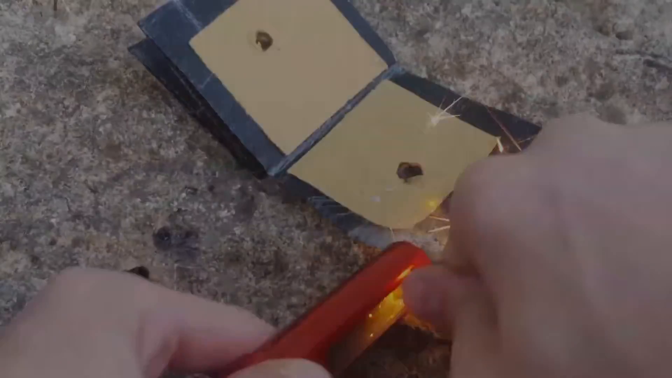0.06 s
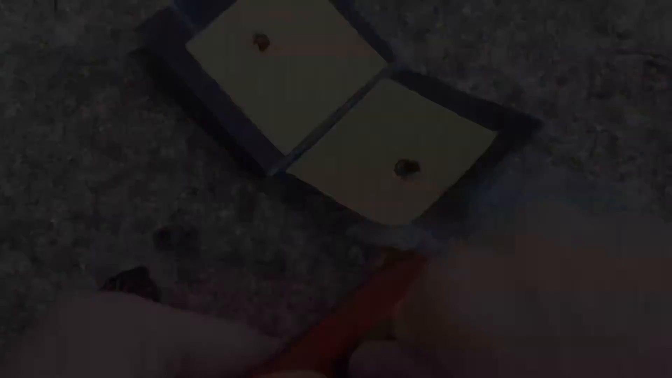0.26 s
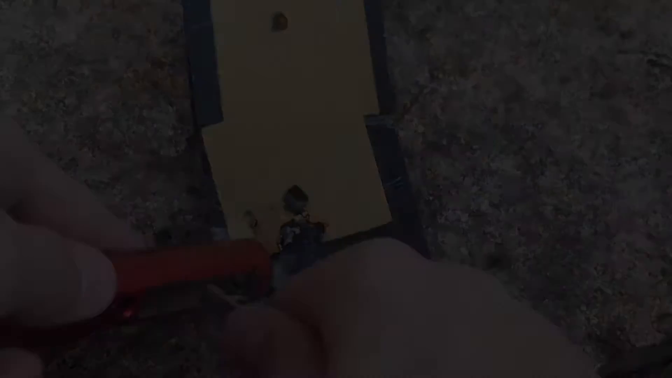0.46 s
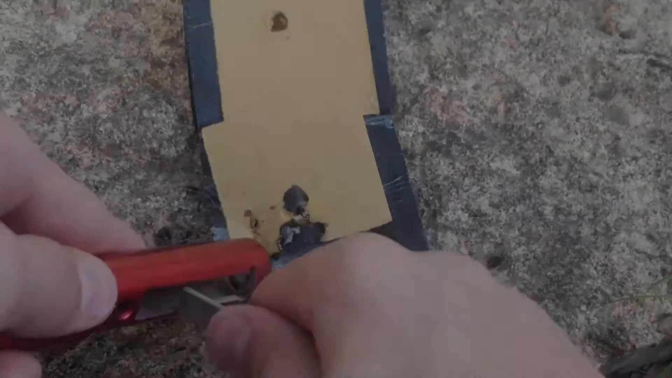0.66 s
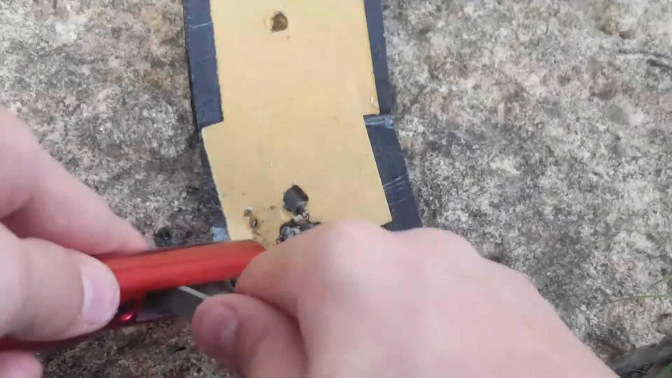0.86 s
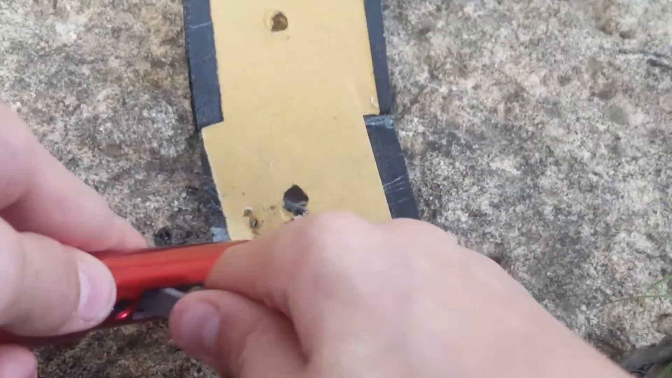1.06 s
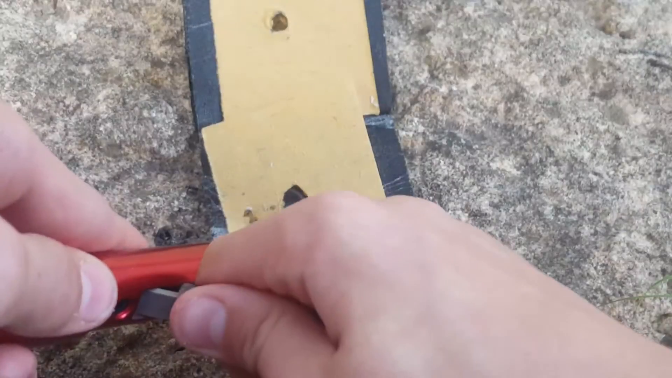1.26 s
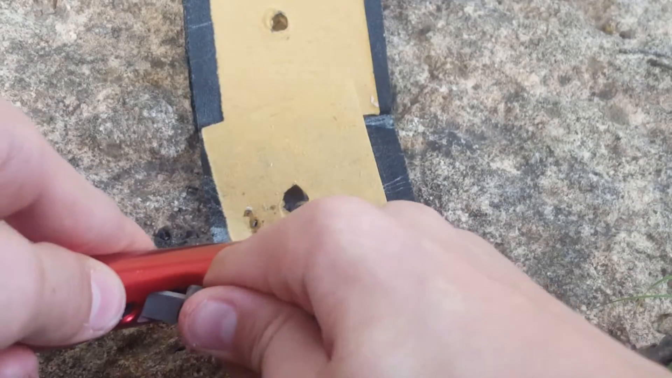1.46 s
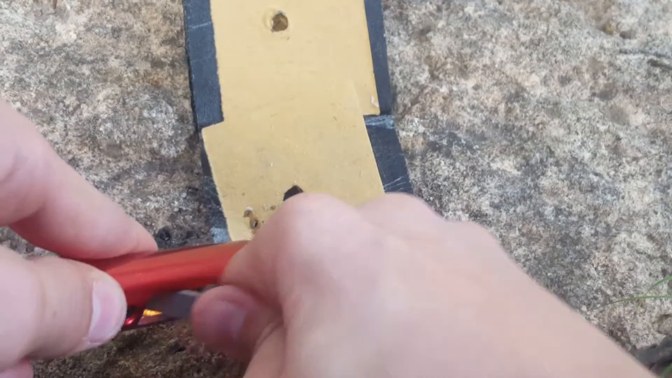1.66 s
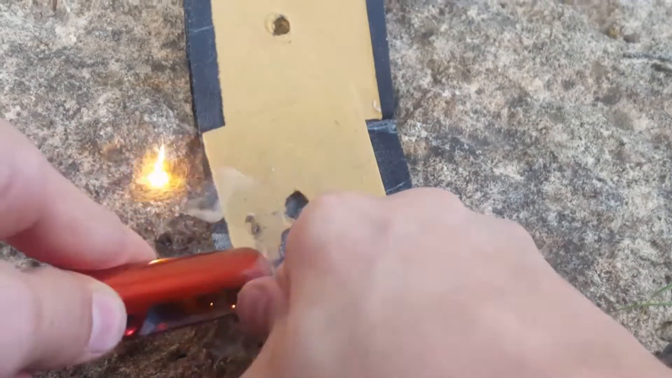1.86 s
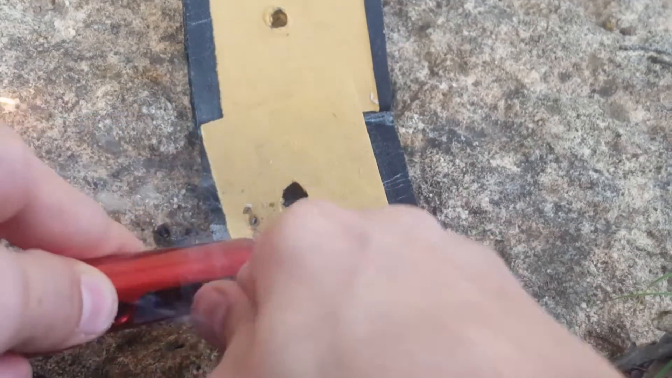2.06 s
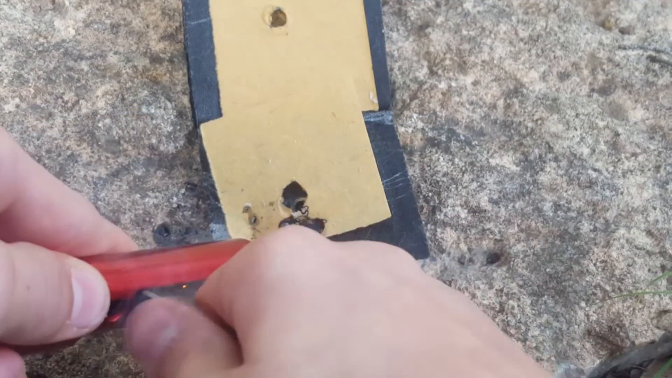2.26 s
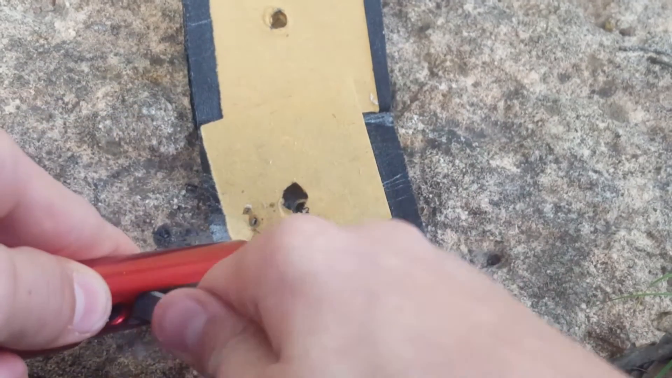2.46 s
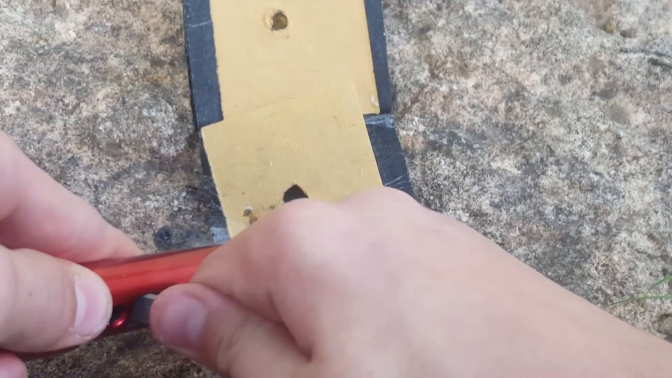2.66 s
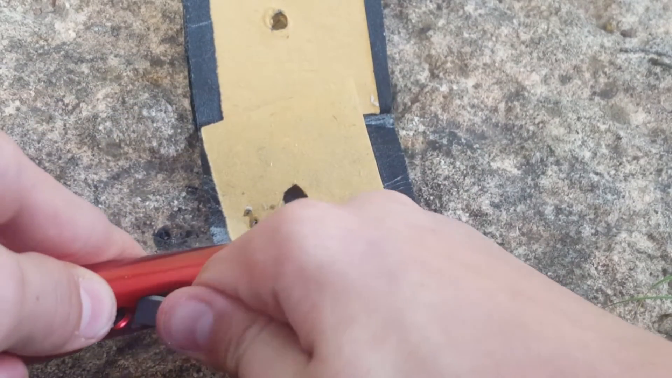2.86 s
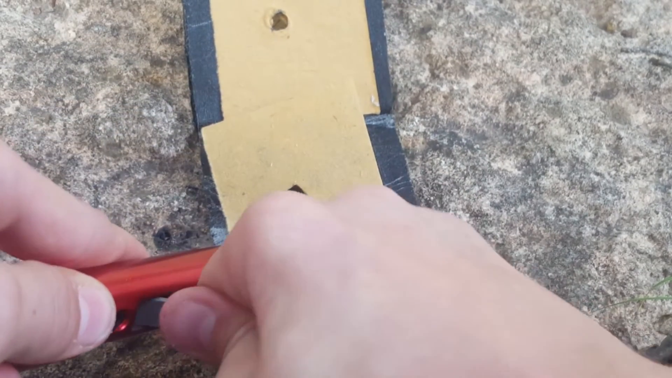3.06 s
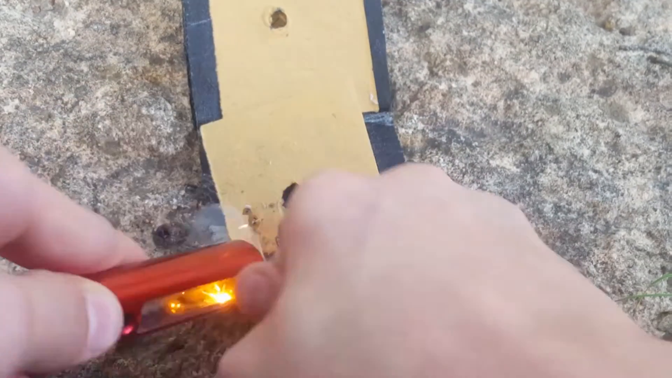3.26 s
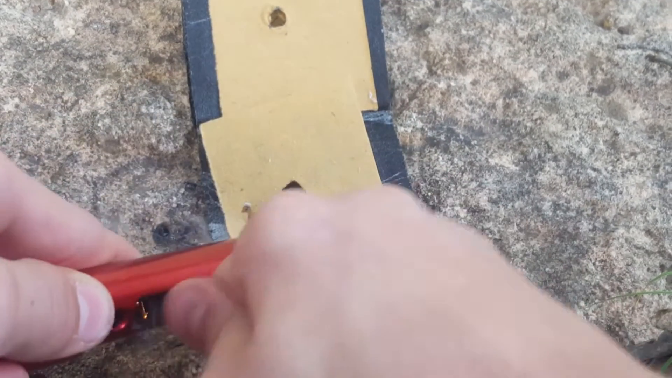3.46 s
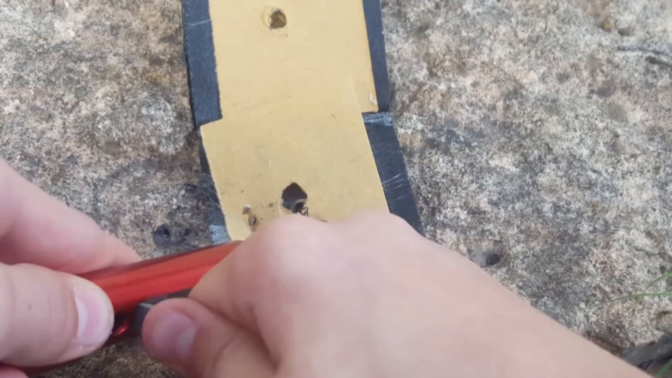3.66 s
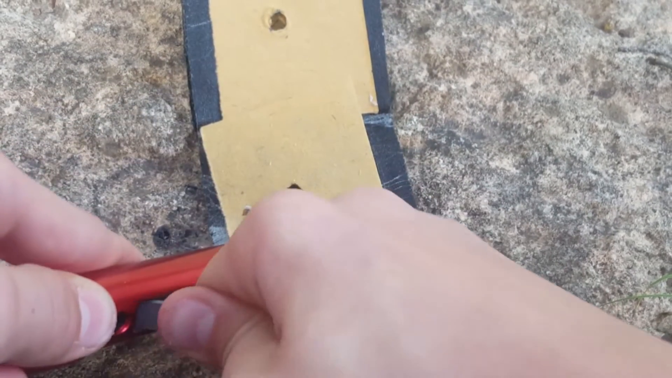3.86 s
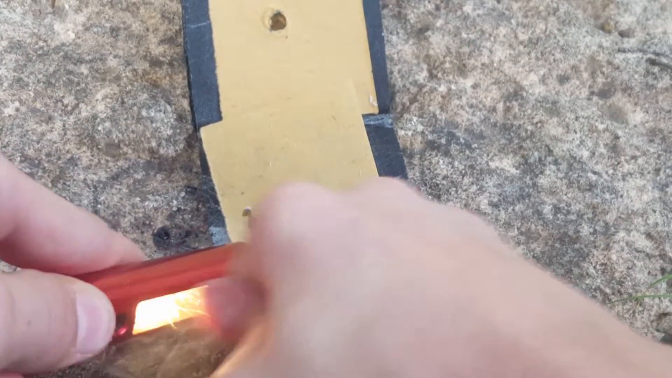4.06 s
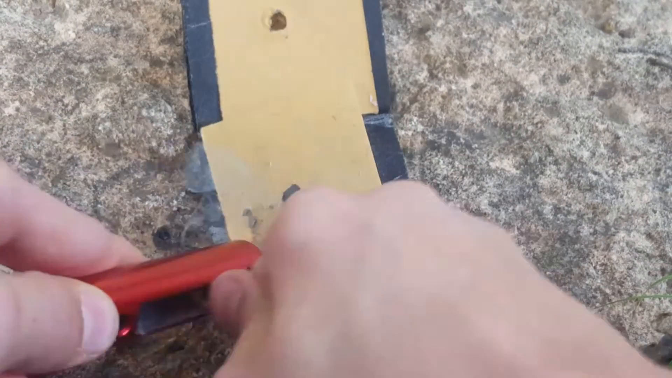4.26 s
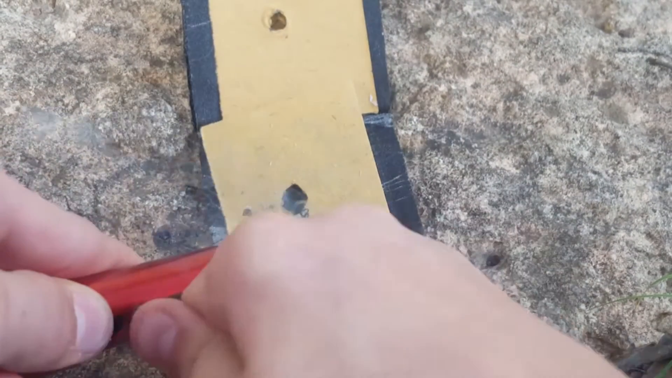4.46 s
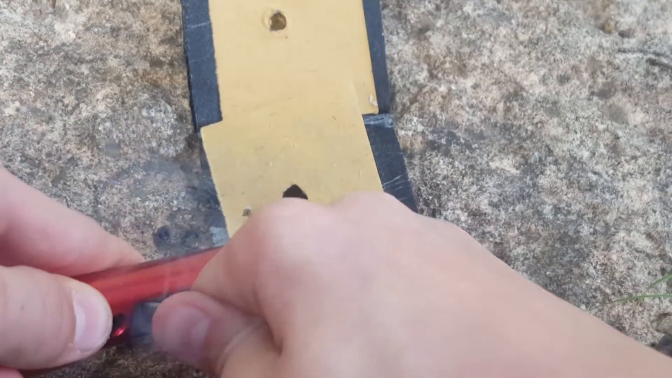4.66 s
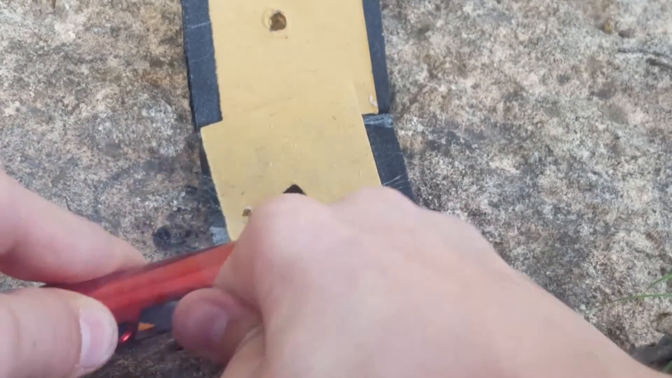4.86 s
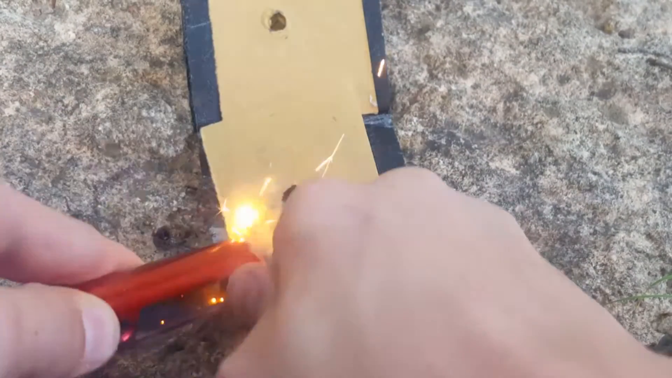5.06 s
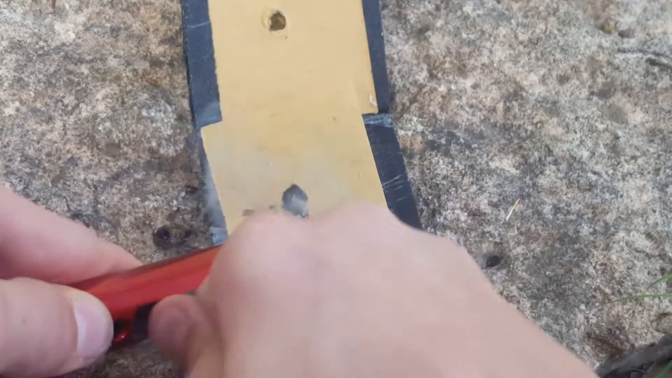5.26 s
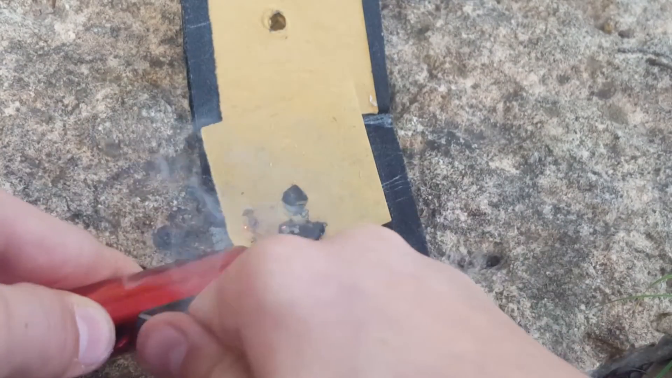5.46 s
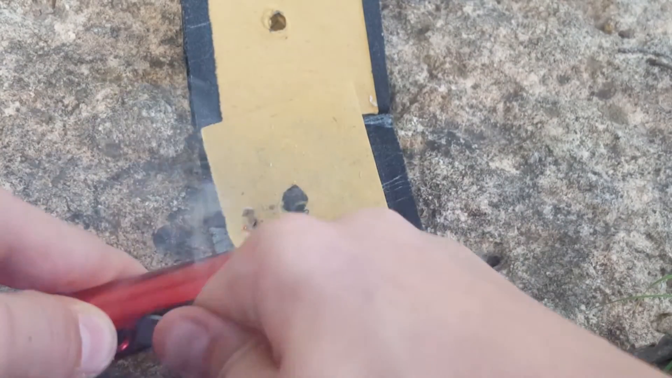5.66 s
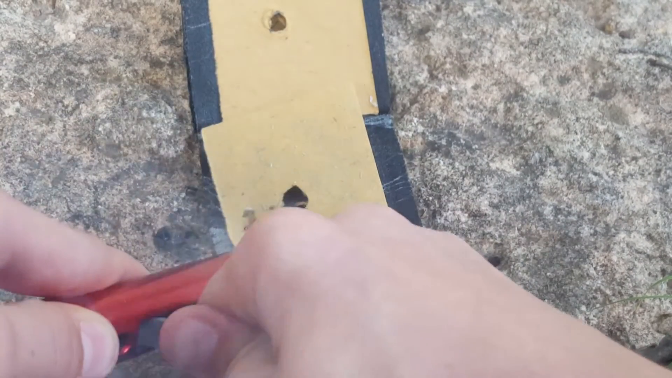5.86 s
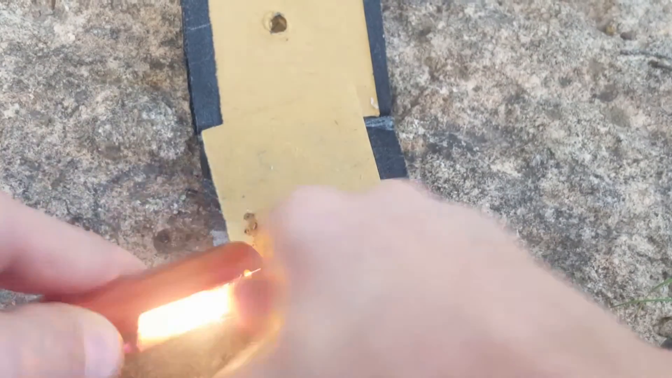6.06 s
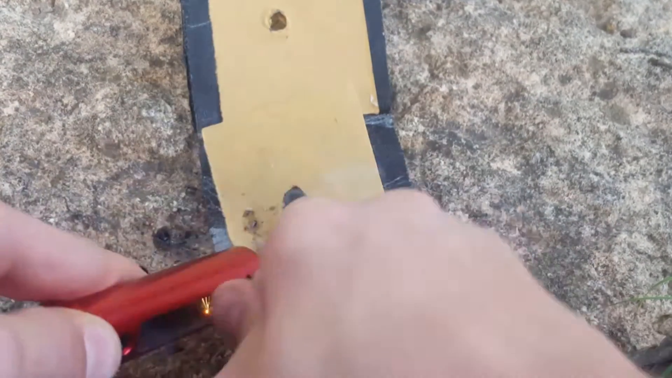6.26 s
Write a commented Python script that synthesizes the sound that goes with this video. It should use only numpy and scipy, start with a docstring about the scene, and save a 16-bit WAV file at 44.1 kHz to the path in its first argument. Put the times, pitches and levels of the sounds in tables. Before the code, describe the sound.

A dry, close stereo sound of metal scraping metal over stony ground, slightly stronger on the left. Short rasping strokes burst out sharply and snap off with clacks, separated by one to two quiet seconds of faint rubbing and clicking. The middle strokes come closer together and have more rattling contacts. Low distant traffic and soft microphone hiss stay far below, joined later by a faint low engine drone.

```python
"""Steel striker on a fire rod

A steel striker is pushed hard down a fire rod near stony ground, close to a two-port microphone.
Each stroke is unevenly modulated noise that also rings the steel modes; it swells and ends in a clack.
Between strokes the striker rubs softly and ticks on the rod: faint grit, short cracks and decaying modes.
Filtered noise makes far traffic and microphone hiss; summed harmonics make an engine slowly gaining speed.
"""
import sys
import numpy as np
from scipy import signal
from scipy.fft import rfft, irfft
from scipy.io import wavfile
from scipy.ndimage import uniform_filter1d

SR = 44100
rng = np.random.default_rng(int(sys.argv[2]) if len(sys.argv) > 2 else 0)


def undo_db(level):
    """Turn decibels back into plain size, where 20 dB means ten times bigger."""
    steps = np.asarray(level, float) / 20
    return 10 ** steps


def log_audio(samples):
    """Write samples as a 16-bit WAV file to the path given in sys.argv[1]."""
    # one column per channel
    frames = np.atleast_2d(samples).T
    # limit to full scale, then quantise
    limited = np.clip(frames, -1, 1)
    pcm = np.round(limited * 32767).astype(np.int16)
    wavfile.write(sys.argv[1], SR, pcm)


N = 278344  # samples, about 6.3 s

# modes of rod and striker: freq_hz [Hz], level_db [dB, relative], t60_s [s]
STEEL_MODES = [(1695, -5, 0.034), (2480, 1, 0.015), (2824, -3, 0.066), (4005, 2.5, 0.037), (4347, 5, 0.012),
               (4810, 0.5, .02), (5437, -0.5, 0.016), (6010, -3, .015), (6465, 0.5, 0.032), (7360, 2, .015),
               (8260, -7, 0.0025), (11550, -5, .012), (11900, -5, 0.0076), (14160, -1.5, .01)]
# spectrum of steel contact as heard through the microphone, with its resonances near 6.5 and 12 kHz:
# freq_hz [Hz], density_db [dB per Hz, relative]
CONTACT_SPECTRUM = [(400, -30.5), (700, -18), (1600, -15.5), (2100, -17), (3200, -8.5), (4200, -5),
                    (5700, -4.5), (6500, 3.5), (7800, -8), (9900, -16.5), (12200, 1.5), (14000, -12.5),
                    (15600, -18), (16300, -46)]
APART_DB = -3  # opposed sound at the two ports, against their common sound


def unit(x):
    """Normalization by mean power: scale to rms 1."""
    return x / np.sqrt(np.mean(x ** 2))


def colour(x, points):
    """Minimum-phase filtering: a folded cepstrum gives a causal response through (Hz, dB) points."""
    hz, db = np.transpose(points)
    grid_hz = np.arange(2049) * SR / 4096 + 1
    log_gain = np.interp(np.log(grid_hz), np.log(hz), db) * np.log(10) / 20
    cepstrum = irfft(log_gain)[:2048]
    folded = cepstrum * np.r_[1, 2 * np.ones(2047)]
    response = irfft(np.exp(rfft(folded, 4096)))
    return signal.fftconvolve(x, response)[:len(x)]


def parts(x):
    """Band splitting: the dull, body, middle and bright part of a sound."""
    # crossovers: edge_hz [Hz]
    edges_hz = [2800, 5000, 9000]
    low, mid, top = edges_hz
    shapes = (low, "low"), ([low, mid], "band"), ([mid, top], "band"), (top, "high")
    filters = [signal.butter(4, hz, kind, fs=SR, output="sos") for hz, kind in shapes]
    return [signal.sosfilt(sos, x) for sos in filters]


def walk(rate):
    """Slow random modulation: levels held 1 / rate s and slewed, with rms 1."""
    hold = max(int(SR / rate), 2)
    levels = np.repeat(rng.standard_normal(N // hold + 1), hold)
    return unit(uniform_filter1d(levels, hold)[:N])


def tail(t60, seconds):
    """Diffuse reverberation: exponentially decaying noise of energy 1 stands for many small reflections."""
    t = np.arange(int(seconds * SR)) / SR
    h = rng.standard_normal(len(t)) * 1000. ** (-t / t60)
    return h / np.sqrt(np.sum(h ** 2))


def ports(common, apart, apart_db):
    """Sum and difference: both ports share one sound; another stretch of the object reaches them opposed."""
    return common + undo_db(apart_db) * apart * np.array([[1], [-1]])


def rubbing():
    """Stick-slip friction: the edge catches and slips, making uneven grit that rings the steel modes."""
    gains = pressure()
    middle_gain = gains[2]
    # each part of the rub catches at its own moments
    gains = [gain * unit(undo_db(2 * walk(120))) for gain in gains]
    # roughness of the grit: a new random level every 16 samples, now and then high
    roughness = np.repeat(rng.exponential(size=N), 16)[:N]
    slips = unit(undo_db(2.0 * walk(600) + 1.4 * walk(200) + 1.02 * roughness))
    # each mode is fed unevenly as the contact point travels
    feeds = [undo_db(db + 3.5 * walk(40)) for _, db, _ in STEEL_MODES]
    ring_db = -8.5  # ringing against grit, before colouring
    voices = []
    for noise in rng.standard_normal((2, N)):
        grit = unit(noise * slips)
        rings = []
        for (hz, _, t60), feed in zip(STEEL_MODES, feeds):
            pole = np.exp(2j * np.pi * hz / SR - np.log(1000) / (t60 * SR))
            resonance = signal.lfilter([1], [1, -pole], grit).imag
            rings.append(feed * unit(resonance))
        rub = colour(grit + undo_db(ring_db) * unit(sum(rings)), CONTACT_SPECTRUM)
        singing = sum(rings[1:4])  # low steel modes, left free by a light rub
        bands = [unit(band) for band in parts(rub) + [singing]]
        voices.append(sum(gain * band for gain, band in zip(gains, bands)))

    # thud passed into hand and ground: freq_hz [Hz], density_db [dB per Hz, relative]
    hand_spectrum = [(40, -14), (90, -4.5), (200, -4), (350, -7), (800, -18.5), (2500, -39.5)]
    hand_db, knee_db = -16.5, -47.5
    # pressure well under the knee passes hardly any thud
    press = middle_gain ** 2 / (middle_gain + undo_db(knee_db))
    thud = [undo_db(hand_db) * press * unit(colour(noise, hand_spectrum))
            for noise in rng.standard_normal((2, N))]
    return ports(*voices, APART_DB), ports(*thud, -10)


def pressure():
    """Incoherent addition: strokes, light rubs and skids sum by power into dull to bright and sing gains."""
    # hard strokes, levels of the middle part: touch_s [s], touch_db [dB], peak_s [s], peak_db [dB], stop_s [s]
    strokes = [(0.0, -51, 0.064, -28, 0.14), (1.735, -53, 1.836, -28.5, 1.891),
               (3.23, -42.5, 3.305, -29.5, 3.402), (4.16, -45, 4.198, -26, 4.25),
               (4.961, -46.5, 5.044, -27.5, 5.14), (6.137, -42, 6.188, -27.5, 6.24)]
    # colour at touch, peak and stop, against the middle part: dull_db [dB], body_db [dB], bright_db [dB]
    stroke_colour = [(-1.5, -1, -2.5), (-9.5, 0, -1.5), (-8.5, -16.5, -7)]
    # light rubs that fade in and out, slides and held run-outs of strokes:
    # start_s [s], length_s [s], start_db [dB], end_db [dB], weight_db [dB]
    light_rubs = [(.136, 0.069, -45.5, -52.5, -1.5), (.226, 0.046, -50, -58.5, -2.5),
                  (.286, 0.006, -56, -55.5, -2), (.305, 0.061, -66, -70.5, -1.5),
                  (.77, 0.03, -64, -58.5, -3), (.85, .11, -66, -68, -8.5), (1.046, 0.052, -65.5, -69, -6.5),
                  (1.155, 0.052, -60.5, -55.5, 2.5), (1.922, .01, -58, -57.5, -6),
                  (2.025, 0.062, -63, -50.5, 1.5), (2.178, 0.13, -58, -57.5, -6),
                  (2.621, 0.011, -65.5, -63, 6.5), (3.17, 0.023, -62, -63.5, 4.5),
                  (3.42, 0.082, -50, -43, -2), (3.52, 0.031, -53.5, -59, 3.5),
                  (3.574, 0.081, -53.5, -56.5, 2), (3.89, .13, -72, -70.5, 0.5),
                  (4.05, .004, -49.5, -50, 2), (4.134, 0.0017, -55, -63, 4),
                  (4.224, .068, -38.5, -48.5, -12.5), (4.355, 0.17, -48.5, -56.5, -0.5),
                  (5.155, 0.054, -56.5, -61.5, -8), (5.29, 0.17, -53.5, -62.5, 2),
                  (5.488, 0.012, -61.5, -63.5, 6.5), (6.23, 0.0068, -41.5, -34.5, -9.5),
                  (6.272, 0.0054, -37, -37, -11), (6.303, 0.0026, -49, -40, -20)]
    # the striker drops onto the rod, skids and jumps off:
    # start_s [s], length_s [s], start_db [dB], end_db [dB], weight_db [dB]
    skids = [(1.969, 0.018, -44, -58, -4), (3.2, .018, -47, -51, -3), (4.028, .052, -54.5, -56, 0),
             (4.897, 0.0335, -54.5, -55, -1), (5.214, .075, -42.5, -49.5, -1.5),
             (6.057, .015, -46, -50, -1)]
    # light rub of weight 0, against its middle part: dull_db [dB], body_db [dB]
    rub_lows = (-3.5, 2)
    rub_dull_db, rub_body_db = rub_lows
    rub_bright_db, sing_at_rest_db = -3.5, -7.5
    lifted_db = -80  # at this level the rub is silent
    slip_off_s, slip_off_db = 0.018, -5.5  # after the peak the edge slips off
    run_out_db = -20.5  # then it runs out this far under the peak
    swell_db, swell_db_per_s = -68.5, 21.5  # a faint hiss rises up to the touch
    fade_in_db_per_s, fade_out_db_per_s, drop_db_per_s = 798.5, 698, 4000
    spent_db_per_s = 380  # extra decay of a stroke after its stop

    t = np.arange(0, N + 44, 44) / SR  # control steps of about 1 ms
    rubs, free_s = [], 0.
    for touch, touch_db, peak, peak_db, stop in strokes:
        times = [touch, peak, peak + slip_off_s, stop + slip_off_s]
        levels = [touch_db, peak_db, peak_db + slip_off_db, peak_db + run_out_db]
        before, after = np.maximum(touch - t, 0), np.maximum(t - stop, 0)
        push = np.interp(t, times, levels) - drop_db_per_s * before
        swell = np.where(t > free_s, swell_db - swell_db_per_s * before, lifted_db)
        db = np.maximum(push, swell) - spent_db_per_s * after
        tints = [np.interp(t, [touch, peak, stop], column) for column in np.transpose(stroke_colour)]
        rubs.append((db, *tints, lifted_db))
        free_s = stop

    kinds = (light_rubs, fade_in_db_per_s, fade_out_db_per_s), (skids, drop_db_per_s, drop_db_per_s)
    for table, on, off in kinds:
        for start, length, start_db, end_db, weight_db in table:
            stop = start + length
            db = np.interp(t, [start, stop], [start_db, end_db])
            db = db - on * np.maximum(start - t, 0) - off * np.maximum(t - start - length, 0)
            # a heavier, flatter contact lifts the low parts
            rubs.append((db, weight_db + rub_dull_db, weight_db + rub_body_db, rub_bright_db,
                         weight_db + sing_at_rest_db))

    power = 0
    for db, dull_db, body_db, bright_db, sing_db in rubs:
        gain = np.maximum(undo_db(db) - undo_db(lifted_db), 0)
        part_levels = dull_db, body_db, 0, bright_db, sing_db
        power = power + np.array([gain * undo_db(part_db) for part_db in part_levels]) ** 2
    return [np.interp(np.arange(N) / SR, t, np.sqrt(row)) for row in power]


def ticks():
    """Impact excitation: each contact is a short crack plus steel modes struck with random strengths."""
    # clacks and ticks: start_s [s], middle_db [dB, peak of the middle part], weight_db [dB], bright_db [dB],
    # favoured_hz [Hz, near which the steel answers most]
    contacts = [(0.0761, -11.5, -9.5, -1, 6400), (0.1355, -30.5, -19, -5, 6000),
                (0.3227, -51.5, 6.5, 6, 4400), (0.425, -55.5, -4.5, 1.5, 7300), (0.6488, -44, 4, -9, 2500),
                (0.7125, -60, -5, 6, 2500), (0.7976, -40, -16, -27, 6400),
                (0.8062, -17, -18.5, -14.5, 7300), (1.0948, -42.5, 5.5, -9, 2500),
                (1.21, -48, 2, -18, 2500), (1.3866, -54, -7.5, -5, 4850), (1.594, -41, -2, -2.5, 4850),
                (1.8495, -13.5, -10, 0, 6400), (1.8743, -34.5, -18.5, 3, 6000),
                (1.9248, -30, -11, 2.5, 6400), (1.9656, -34.5, -13, -18, 7300),
                (1.9815, -29.5, -7.5, -11, 7300), (2.0213, -49.5, 12, -10, 4350),
                (2.4447, -38, -16, 3.5, 4850), (2.4949, -50.5, -11.5, -6, 7300),
                (2.6305, -54, 12, -14.5, 2500), (3.0055, -50, 3, 4.5, 4350), (3.1585, -51.5, -1, -3, 5400),
                (3.2975, -23.5, 5, -12, 4000), (3.3135, -17, -8, 4.5, 6400), (3.3325, -24, -10, -7.5, 6400),
                (3.4119, -26, -20, -7, 6400), (3.4422, -29.5, -11, -4, 6400),
                (3.491, -18.5, -11.5, -6, 6400), (3.5065, -36, 4, -4, 2800), (3.5715, -45.5, 3.5, 4, 2800),
                (3.6366, -32, 3.5, -8, 5400), (3.8865, -45.5, 0.5, -10, 7300),
                (3.976, -47.5, -0.5, -5, 5400), (3.9835, -41, -1.5, -5, 7300), (4.01, -50.5, 0, -6, 2800),
                (4.0386, -44.5, 9, 5.5, 5400), (4.1398, -41, -8, 3.5, 6000), (4.161, -34, -2.5, 1, 2800),
                (4.1879, -21, -9, 0, 6400), (4.2062, -13.5, -13.5, 3.5, 6400), (4.2313, -42, 6, -10, 1600),
                (4.2972, -29.5, -13.5, -10, 6400), (4.3171, -44, -4, 0, 6400),
                (4.5158, -40, 5.5, -20, 2500), (4.6429, -48.5, 0, -6, 4000),
                (4.7456, -52.5, -6.5, -3.5, 4000), (4.8985, -51.5, 3, -7, 2800),
                (4.9595, -42.5, 0.5, -9.5, 6400), (5.0543, -12, -5.5, 0.5, 6400),
                (5.1354, -33, 3.5, 1, 6400), (5.2136, -25.5, -3, -22, 4350), (5.7357, -41.5, 1, -6.5, 7300),
                (5.82, -59, 2, 5, 2500), (6.0626, -37.5, -12, -2, 4850), (6.14, -42.5, 3, 15.5, 6400),
                (6.1955, -13, -5, -4, 6400)]
    # contact of weight 0, against its middle part: dull_db [dB], body_db [dB]
    contact_lows = (-1, 2.3)
    t60_s, attack_s = 0.009, 0.00099
    crack_db = 3.5  # noise against modes, before colouring
    favoured_db = -7.5  # the mode that answers most, against the peak of the rest

    out = np.zeros((2, N + 2048))
    t = np.arange(2048) / SR
    hz, mode_db, _ = np.transpose(STEEL_MODES)[:, :, None]
    fade = 1000. ** (-t / t60_s) * np.minimum(t / attack_s, 1)
    for start, db, weight_db, bright_db, near_hz in contacts:
        favoured = np.argmin(np.abs(hz - near_hz))
        dull_db, body_db = weight_db + np.array(contact_lows)
        for voice in out:
            strength, detune, phase = rng.standard_normal((3, len(STEEL_MODES), 1))
            waves = np.sin(2 * np.pi * hz * (1 + 0.03 * detune) * t + phase)
            modes = np.sum(undo_db(mode_db + 3.0 * strength) * waves, axis=0)
            crack = undo_db(crack_db) * rng.standard_normal(len(t))
            hit = colour(fade * (unit(modes) + crack), CONTACT_SPECTRUM)
            dull, body, middle, bright = (part / np.max(np.abs(part)) for part in parts(hit))
            hit = middle + undo_db(dull_db) * dull + undo_db(body_db) * body + undo_db(bright_db) * bright
            ring_hz = hz[favoured] * (1 + 0.022 * detune[favoured])
            ring = fade / np.max(fade) * np.sin(2 * np.pi * ring_hz * t + 3 * phase[favoured])
            ring = undo_db(favoured_db) * np.max(np.abs(hit)) * ring
            first = int(start * SR)
            voice[first:first + len(t)] += undo_db(db) * (hit + ring)
    return ports(*out[:, :N], APART_DB)


def engine():
    """Harmonic synthesis: lines at engine orders follow a rising firing rate; the air makes them waver."""
    # far engine: time_s [s], firing_hz [Hz], level_db [dB, relative]
    course = [(2.6, 93, -69.5), (3.0, 100, -67), (3.5, 103, -61), (4.2, 106, -59.5), (4.6, 112, -64),
              (5.6, 118, -58), (6.31, 119, -55)]
    # lines: multiple [of the firing rate], line_db [dB, relative]
    orders = [(.5, -15), (1, 3.5), (1.5, -12.5), (2, -20), (2.5, -30)]
    s, hz, db = np.transpose(course)
    t = np.arange(N) / SR
    firing_hz = np.interp(t, s, hz) * (1 + 0.009 * walk(14))
    phase = 2 * np.pi * np.cumsum(firing_hz) / SR
    lines = sum(undo_db(line_db + 1.3 * walk(9)) * np.sin(multiple * phase) for multiple, line_db in orders)
    return np.sqrt(2) * lines * undo_db(np.interp(t, s, db, left=-90))


def background():
    """Spatial coherence: traffic is nearly alike at both ports, while each port hisses alone."""
    # level of the low rumble, which dips and recovers: time_s [s], level_db [dB]
    rumble_course = [(0.0, -56), (0.259, -63.5), (0.98, -59), (1.85, -57), (2.13, -63), (3.501, -54.5),
                     (4.921, -62.5), (5.08, -59), (6.31, -57)]
    # traffic spectrum: freq_hz [Hz], density_db [dB per Hz, relative]
    rumble_spectrum = [(15, -35.5), (35, -14), (55, -4), (90, 1.5), (150, -7), (200, -12.5), (260, -21.5),
                       (450, -25), (1000, -30.5), (3000, -58.5)]
    # microphone hiss spectrum: freq_hz [Hz], density_db [dB per Hz, relative]
    hiss_spectrum = [(150, -41), (600, -11.5), (1500, -10.5), (3000, -12.5), (5600, -17), (6500, -15),
                     (7600, -20.5), (9800, -27.5), (12200, -18), (14000, -22.5), (15600, -29.5),
                     (16300, -63)]
    hiss_db = -74.5
    s, db = np.transpose(rumble_course)
    mid, side = (colour(rng.standard_normal(N), rumble_spectrum) for _ in range(2))
    side = colour(side, [(30, -10.5), (80, -15), (300, -7.5), (700, -2)])
    level = undo_db(np.interp(np.arange(N) / SR, s, db) + 0.88 * walk(4.5))
    rumble = ports(mid, side, 0) / np.std(mid) * level
    hiss = [unit(colour(rng.standard_normal(N), hiss_spectrum)) for _ in range(2)]
    return rumble + undo_db(hiss_db) * np.array(hiss)


def scene():
    """Propagation: the rod reaches the left port first, the right later and duller; ground adds a short tail."""
    # right port against left: freq_hz [Hz], gain_db [dB]
    shadow = [(300, -8), (1300, 0), (4400, -3), (8000, -8.5), (13000, -6.5)]
    port_lag_s = 0.00013
    ground_db, ground_t60_s = -30.5, 0.08
    edge, thud = rubbing()
    left, right = edge + ticks()
    # a linear phase turns the spectrum into a delay
    lag = np.exp(-2j * np.pi * np.arange(N // 2 + 1) * SR / N * port_lag_s)
    near = np.array([left, irfft(rfft(colour(right, shadow)) * lag, N)])
    wet = [signal.fftconvolve(x, undo_db(ground_db) * tail(ground_t60_s, 0.15))[:N] for x in near]
    balance = undo_db(np.array([[0.8], [-0.8]]))  # left slightly stronger
    return near + wet + (thud + engine()) * balance + background()


def low_pass(x):
    """Removes everything above the highest recorded frequency."""
    return signal.sosfilt(signal.butter(12, 16480, fs=SR, output="sos"), x)


def record(dry):
    """Two-channel recording: the signals of both ports are kept together as the finished mix."""
    return low_pass(dry)


dry = scene()
out = record(dry)
log_audio(out)
```